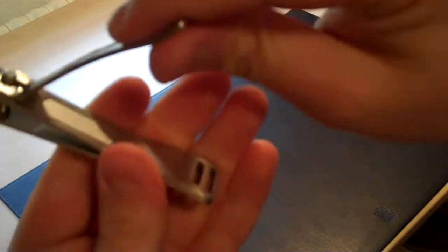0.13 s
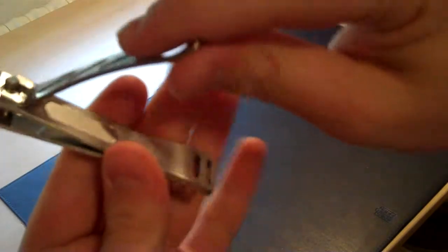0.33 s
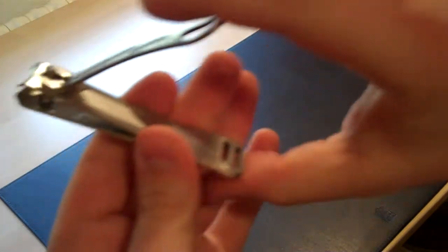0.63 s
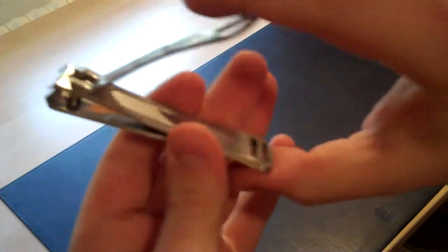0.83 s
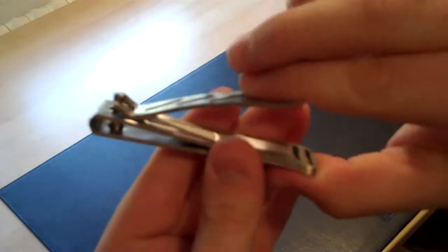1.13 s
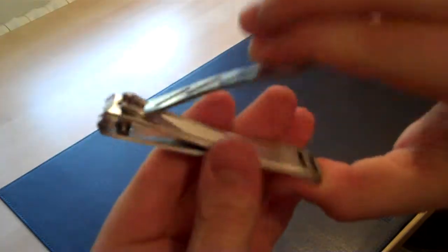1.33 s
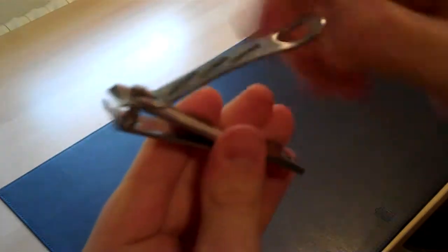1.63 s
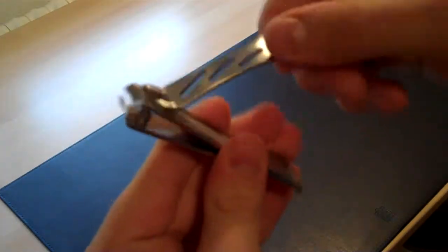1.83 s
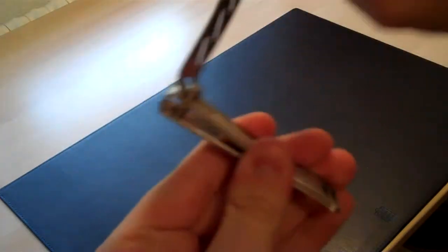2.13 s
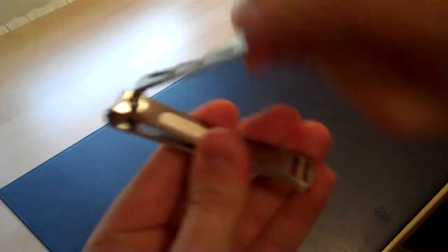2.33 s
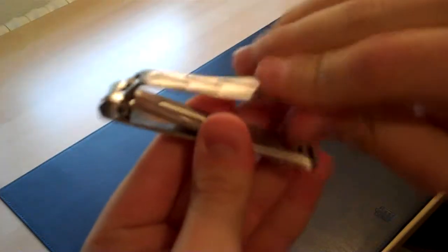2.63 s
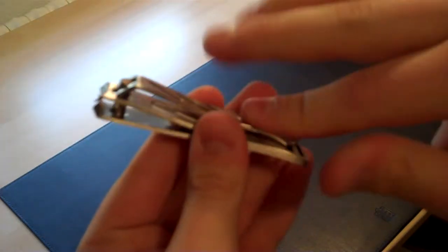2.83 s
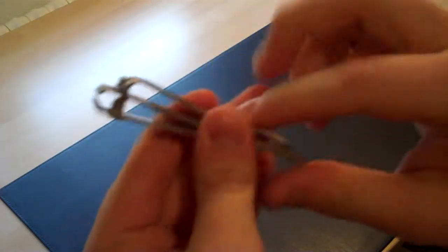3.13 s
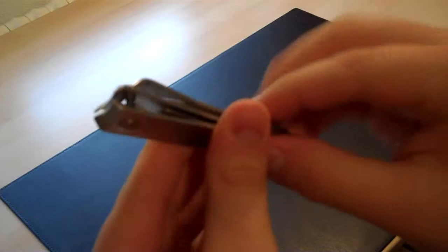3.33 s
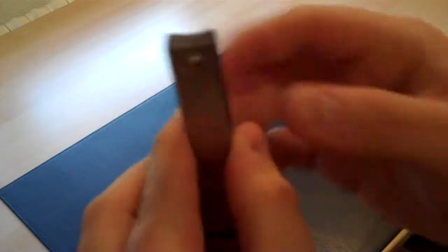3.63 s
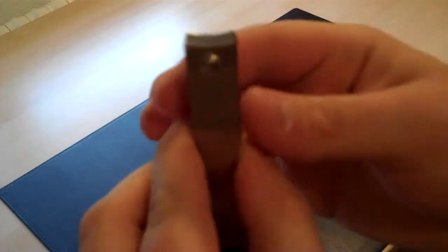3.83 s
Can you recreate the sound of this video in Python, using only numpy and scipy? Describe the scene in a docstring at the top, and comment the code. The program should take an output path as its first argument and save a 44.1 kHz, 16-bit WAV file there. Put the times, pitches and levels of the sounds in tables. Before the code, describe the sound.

A metal nail clipper is handled close to the microphone in a quiet room. Its lever scrapes thinly and ticks, snaps shut with one sharp click, then gives a few fainter ticks, over soft finger rubbing and low hiss.

```python
"""A quiet room: a steel nail clipper is handled close to a small two-port camera microphone.
The lever ticks, scrapes round its pin and snaps shut; skin rubs softly.
Each port adds its own treble resonance, the room answers briefly,
and independent hiss of the two capsules lies under all."""
import sys
import numpy as np
from scipy import signal
from scipy.fft import rfft, irfft
from scipy.io import wavfile
from scipy.ndimage import uniform_filter1d

SR = 44100
rng = np.random.default_rng(int(sys.argv[2]) if len(sys.argv) > 2 else 0)


def unload_wav(signal):
    """Save mono or channel-first audio to the path in sys.argv[1] as 16-bit WAV at rate SR, clipped to [-1, 1]."""
    wavfile.write(
        sys.argv[1],
        SR,
        np.round(np.clip(np.atleast_2d(signal).T, -1, 1) * 32767).astype(np.int16),
    )


N = 176400
NOISE_TOP_HZ = 14320  # scrapes and hiss


def undb(db):
    """dB to gain."""
    return 10 ** (np.asarray(db) / 20)


def curve(table, hz):
    """Interpolate (freq_hz, level_db) points on a log frequency axis."""
    freq_hz, level_db = np.array(table).T
    return np.interp(np.log(hz + 1), np.log(freq_hz), level_db)


def min_phase(table):
    """Minimum-phase impulse response from (freq_hz, level_db) points."""
    cepstrum = irfft(np.log(undb(curve(table, np.linspace(0, SR / 2, 513)))))
    cepstrum[1:512] *= 2
    cepstrum[513:] = 0
    return irfft(np.exp(rfft(cepstrum)))[:256]


def resonate(x, hz, width_hz):
    """Two-pole resonance, unity peak gain."""
    return signal.lfilter(*signal.iirpeak(hz, hz / width_hz, SR), x)


def clicks():
    """Steel strikes steel: a contact tick plus the modes of the hand-damped clipper."""
    # start_s, right_peak_db, left_minus_right_db, ring_share, time_scale, low_cut_hz
    blows = [(0.9017, -50.5, 11, 0.8, 0.94, 6600), (1.1499, -26.5, 7.5, 0.12, 0.24, 4670),
             (2.1265, -41, 3, 1, 0.38, 4500), (2.2165, -44, 4, 0.6, .5, 5000),
             (2.2954, -29.5, 7, 0.3, 0.086, 1800), (2.326, -50, 6, 0.3, .4, 4000),
             (2.4102, -44.5, 2, 0, 0.2, 3000), (2.9058, -7, 5.5, 0.61, 0.52, 1800),
             (3.284, -57, 6, .9, 0.87, 5000), (3.302, -43, -7, 0.03, .3, 2000),
             (3.809, -46, 0, 0.2, .4, 2500), (3.9375, -41, 7.5, 1, 1.1, 6600)]
    # tick spectrum: freq_hz, level_db
    contact = [(500, -37), (1500, -14), (3000, 0.5), (5000, -5), (6500, -14), (8000, -10), (10000, 0),
               (12000, -25), (14000, -6), (14800, -38), (17000, -21)]
    # freq_hz, level_db, base_t60_s
    modes = [(2740, -13.5, 0.0232), (4060, -14, 0.023), (4350, -12, 0.026), (4580, -7, 0.011),
             (5700, -13, 0.0098), (6230, 0, 0.017), (7100, -8.5, 0.015), (7570, -17, .06),
             (7700, 8.5, .015), (8590, -3, 0.016), (9070, -30, 0.017), (11150, 6.5, 0.0051),
             (13000, -9.5, 0.014), (14150, -5, 0.015)]
    base_grit_t60_s, base_rise_s = 0.0064, 0.0006
    out = np.zeros((2, N + 4096))
    t = np.arange(2048) / SR
    for start_s, peak_db, pan_db, ring_share, time_scale, low_cut_hz in blows:
        age = t / time_scale
        grit = 0.9 * rng.standard_normal(len(t)) * 1000. ** (-age / base_grit_t60_s)
        tick = np.convolve((t == 0) + grit, min_phase(contact))[:len(t)]
        ring = sum((-1) ** i * undb(db) * np.sin(2 * np.pi * hz * t) * 1000. ** (-age / t60)
                   for i, (hz, db, t60) in enumerate(modes))
        ring *= (1 - np.exp(-age / base_rise_s)) / 4
        hit = ring_share * ring + (1 - ring_share) * tick
        hit = signal.sosfilt(signal.butter(4, low_cut_hz, "high", fs=SR, output="sos"), hit)
        start = int(start_s * SR)
        for side, db in enumerate([peak_db + pan_db, peak_db]):
            port_peak = np.abs(port(hit, side)).max()
            out[side, start:start + len(t)] += undb(db) * hit / port_peak
    return out[:, :N]


def scrapes():
    """Lever and fingers scrape: dense fluttering slips ring a moving band of the lever over a rasp."""
    # per stroke: time_s, level_db, left_minus_right_db, ring_hz, rasp_re_ring_db, low_re_ring_db
    strokes = [
        [(0.0, -84, 9, 7670, -11, 14), (0.014, -66, 10.0, 7710, -9, -26), (0.036, -57, 16, 7730, -16, -7),
         (0.06, -60, 9.0, 7720, -4, 0)],
        [(0.06, -59.5, 9.0, 7650, -9, 4), (0.088, -51.5, 5.9, 8060, 2.5, 0), (0.122, -56.5, 7, 7700, -1, 3),
         (0.132, -58, 9.0, 7600, -9, -15), (0.19, -92, 1, 7350, -15, 5)],
        [(0.915, -73, 11.0, 7360, -9, -15), (0.931, -73, 5.0, 7520, -9, -11),
         (1.027, -67.5, 6.3, 7430, -9, -21), (1.047, -73, 4.0, 7400, -7, -7), (1.071, -71, 3.5, 7400, -9, -18),
         (1.12, -70, 4.0, 7350, -9, -11)],
        [(1.45, -79, 2.0, 6810, -7, -8), (1.478, -68, 3.0, 6750, -11, -10), (1.508, -73, 3.0, 6930, -7, -10),
         (1.548, -59.5, 6, 7360, -3, -7), (1.608, -79, 3.0, 6960, -9, -10), (1.62, -65, 5, 6910, -9, -8)],
        [(1.7, -83, 2.5, 7020, -11, 0), (1.722, -87, 3.5, 7340, -9, 1), (1.732, -63.5, 7, 7500, -9, -15),
         (1.778, -73, 7, 7320, -9, -16), (1.796, -83, 4.0, 7100, -5, -11), (1.8, -84, 4.0, 7110, -9, 3)],
        [(1.87, -86, 5, 7970, -9, 5), (1.888, -56, 12, 8000, -9, -20), (1.904, -52, 9.4, 8000, 1, -13),
         (1.984, -59.5, 2, 6850, 4, -13), (2.01, -49.5, 1.5, 6500, 3, -18), (2.08, -53.5, 1.0, 6700, 0, -11)],
        [(2.08, -55.5, 1, 6450, 4, -13), (2.104, -42.5, 1, 6490, 2, -30), (2.118, -41, 1, 6600, -9, -24)],
        [(2.118, -42.5, 3, 6420, -23, -25), (2.13, -33, -4, 6600, -34, -41), (2.144, -50.5, 4, 6600, 1, -15),
         (2.205, -67, 6, 6750, -7, -20)],
        [(2.21, -62, 3.0, 6580, -9, -15), (2.218, -52.5, 1.5, 6510, -9, -25),
         (2.244, -54.5, -1.0, 6700, 7, -26), (2.262, -49.5, 2, 6500, -1, -27),
         (2.288, -69, 4.5, 6550, -13, -13)],
        [(2.305, -60, 4.5, 6930, -1, -12), (2.405, -66, 5.5, 7700, -3, -17), (2.411, -60.5, 3, 7300, -5, -15),
         (2.419, -70, 4.0, 7150, -7, -7), (2.46, -67, 8.7, 7370, -7, -12)],
        [(2.55, -71, 2.5, 6850, -9, -15), (2.586, -67, 6, 7000, -7, -12), (2.638, -85, 2.5, 6860, -4, -6),
         (2.714, -59.5, 3.0, 6860, -8.5, -15), (2.732, -62, 4.0, 6960, -6, -11),
         (2.76, -74, 3.0, 7000, -8, -18)],
        [(2.83, -63, 2.0, 6520, -11, -14), (2.842, -55.5, 3, 6400, 3, -11), (2.862, -55.5, 2, 6300, 7, -18),
         (2.895, -67, 6.0, 6510, -12, -12)],
        [(3.1, -69.5, 3.0, 6850, -9, -15.5), (3.274, -77, 4.0, 7400, -9, -1), (3.282, -67.5, 4.5, 7430, -6, -9),
         (3.398, -73, 2.0, 6930, -11, -12), (3.436, -62, 8, 7600, -9, -21), (3.47, -88, 2.5, 7140, -8, -5)],
        [(3.5, -65, 3.0, 7200, -7, -14.5), (3.522, -72, 5.3, 7750, -1, -7), (3.546, -60.5, 13, 8100, 0, -24),
         (3.584, -59, 6.0, 7440, -4, -7), (3.608, -59, 11, 7510, -6, -15), (3.68, -80.5, 3.0, 7360, -9, -10)],
        [(3.68, -74, 3.0, 7260, -9, -3), (3.712, -72, 4.0, 7330, -8, -19), (3.75, -74, 2.5, 7100, -7, -9),
         (3.818, -62, 7.4, 7340, -3, -15), (3.836, -76, 4.0, 7100, -5, -6), (3.85, -76, 3.5, 7090, -4, -18)],
        [(3.925, -72, 12, 7610, -9, -8), (3.933, -48.5, 10, 7540, -16, -30), (3.943, -69, 15, 7400, -17, -39),
         (3.949, -59, 13.0, 7590, -17, -25), (3.965, -51, 12, 7560, -25, -27), (4.0, -78, 8.8, 7560, -9, -21)],
    ]
    # slip spectrum: freq_hz, level_db
    rasp_colour = [(1500, -26), (3000, -3.5), (4500, -1.5), (6000, -4), (8000, -4), (10500, -6.5),
                   (14000, -6)]
    slips_per_s, flutter_db, band_width_hz = 7600, 1.5, 750
    t = np.arange(N) / SR
    slip_db = -3 * np.minimum(rng.exponential(size=N), 4)
    slips = (rng.random(N) < slips_per_s / SR) * rng.standard_normal(N) * undb(slip_db)
    flutter = uniform_filter1d(rng.standard_normal(N), size=150)
    slips *= undb(flutter_db * flutter / flutter.std())
    rasp = signal.fftconvolve(slips, min_phase(rasp_colour))[:N]
    rasp = signal.sosfilt(signal.ellip(10, .2, 50, NOISE_TOP_HZ, fs=SR, output="sos"), rasp)

    time_s, _, _, *tracks = np.vstack(strokes).T
    ring_hz, rasp_db, low_db = (np.interp(t, time_s, track) for track in tracks)
    ring = sum(np.exp(-((ring_hz - hz) / band_width_hz) ** 2) * resonate(rasp, hz, width_hz=300)
               for hz in (6330, 6370, 7000, 7500, 7980))
    low = resonate(rasp, hz=4300, width_hz=1800)
    scrape = ring / ring.std() + undb(rasp_db) * rasp / rasp.std() + undb(low_db) * low / low.std()

    gain = np.zeros((2, N))
    for stroke in strokes:
        time_s, level_db, pan_db = np.array(stroke).T[:3]
        gate = np.clip(np.minimum(t - time_s[0], time_s[-1] - t) / .003 + .5, 0, 1)  # 3 ms ramps
        side_db = np.outer([.5, -.5], np.interp(t, time_s, pan_db))
        gain += gate * undb(np.interp(t, time_s, level_db) + side_db)
    port_rms = [uniform_filter1d(port(scrape, side) ** 2, size=8000) ** .5 for side in range(2)]
    return gain * scrape / port_rms


def rubs():
    """Skin of the cupped hands rubs softly in two hollow bands, alike on both capsules."""
    # per rub: time_s, low_band_db, upper_band_db
    strokes = [
        [(0.84, -67, -77), (0.892, -73, -97), (0.942, -62, -70), (1.028, -73, -76), (1.09, -67.5, -74),
         (1.2, -71, -91)],
        [(2.12, -74, -93), (2.136, -88, -72), (2.226, -65.5, -67.5), (2.28, -78, -69), (2.318, -74, -70),
         (2.38, -68, -78)],
        [(3.22, -71, -81), (3.25, -69, -71), (3.43, -78, -73), (3.518, -65, -70.5), (3.662, -70, -73),
         (3.7, -75, -68)],
        [(3.7, -63, -72), (3.722, -68, -71), (3.74, -68.5, -76), (3.762, -64, -71), (3.814, -55, -67.5),
         (3.93, -74, -80)],
    ]
    # centre_hz, width_per_pass_hz
    hollows = [(430, 160), (1330, 180)]
    out, t = 0, np.arange(N) / SR
    for column, (hz, width_hz) in enumerate(hollows, start=1):
        band = rng.standard_normal(N)
        for _ in range(2):
            band = resonate(band, hz, width_hz)
        gain = sum(undb(np.interp(t, rub[:, 0], rub[:, column], left=-120, right=-120))
                   for rub in map(np.array, strokes))
        out += gain * band / uniform_filter1d(band ** 2, size=2000) ** .5
    return out


def port(x, side):
    """The cavity in front of one capsule lifts a treble band."""
    # left, right: centre_hz, width_hz, band_gain_db
    cavities = [(7700, 2400, 12), (6300, 1100, 14)]
    hz, width_hz, band_gain_db = cavities[side]
    return x + undb(band_gain_db) * resonate(x, hz, width_hz)


def room(x):
    """Short diffuse tail of reflections, independent left and right."""
    # tail spectrum: freq_hz, level_db
    colour = [(1000, -5.5), (4000, -5), (5500, -7), (6300, -4.5), (7600, 0.5), (9000, -5), (11000, -6),
              (14100, -4), (14400, -60), (20000, -60)]
    t60_s, onset_s = 0.24, 0.0016
    gain = undb(-19) / np.sqrt(SR / 1000)
    t = np.arange(SR // 2) / SR
    hz = np.fft.rfftfreq(len(t), 1 / SR)
    noise = irfft(rfft(rng.standard_normal((2, len(t)))) * undb(curve(colour, hz)))
    tail = noise * 1000. ** (-t / t60_s) * np.clip(t / onset_s - .5, 0, 1)
    return signal.fftconvolve(x, gain * tail, axes=1)[:, :N]


def hiss():
    """Self-noise of the two capsules, independent and stronger on the left."""
    # noise spectrum: freq_hz, relative_db
    colour = [(12, -44), (20, -10.5), (161, -4), (365, -4.5), (419, -3), (809, -6), (903, -6), (1330, -8.5),
              (1480, -9), (4680, -13.5), (14000, -19.5)]
    # freq_hz, left_minus_right_db
    balance = [(60, 3.3), (110, 7.4), (200, 9.9), (380, 8.2), (700, 8), (1290, 6.9), (2380, 5.7),
               (4400, 1.2), (8120, 4.2), (15000, 0.34)]
    mid_rms_db = -62
    hz = np.fft.rfftfreq(N, 1 / SR)
    shape_db = curve(colour, hz) + np.outer([.5, -.5], curve(balance, hz))
    shape = undb(shape_db) / (1 + (hz / NOISE_TOP_HZ) ** 600)
    noise = irfft(rfft(rng.standard_normal((2, N))) * shape, N)
    return undb(mid_rms_db) * noise / noise.mean(0).std()


def scene():
    """Clipper and room pass the ports; rubs and hiss are added."""
    steel = clicks() + scrapes()
    steel[0] = np.roll(steel[0], 1)  # left lags one sample
    air = steel + room(steel)
    return np.array([port(air[side], side) for side in range(2)]) + rubs() + hiss()


def record(dry):
    """Steep low-pass at 16.4 kHz."""
    return signal.sosfilt(signal.ellip(10, .2, 80, 16400, fs=SR, output="sos"), dry)


dry = scene()
out = record(dry)
unload_wav(out)
```